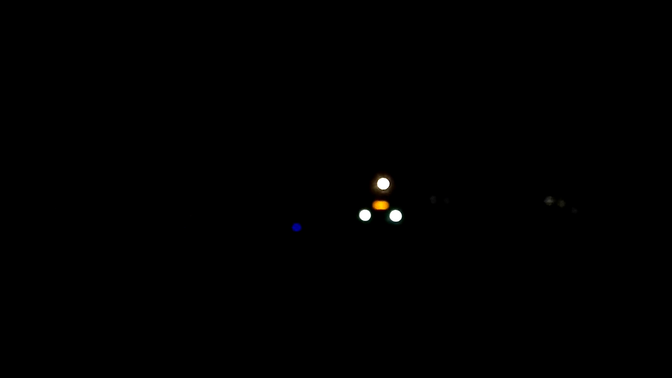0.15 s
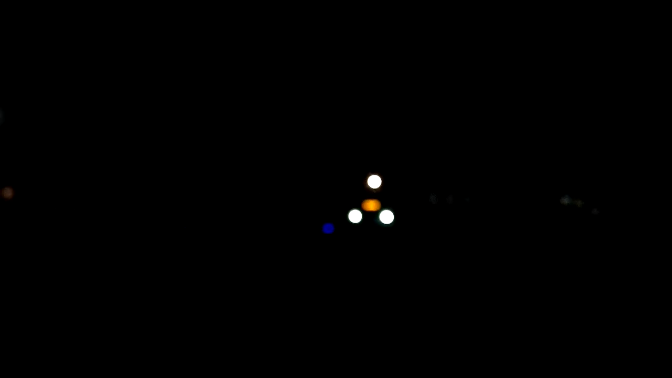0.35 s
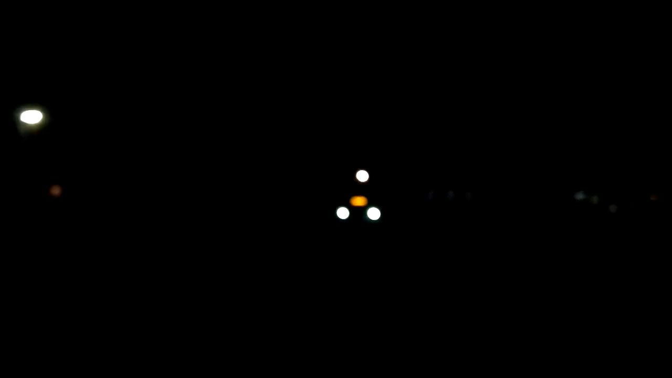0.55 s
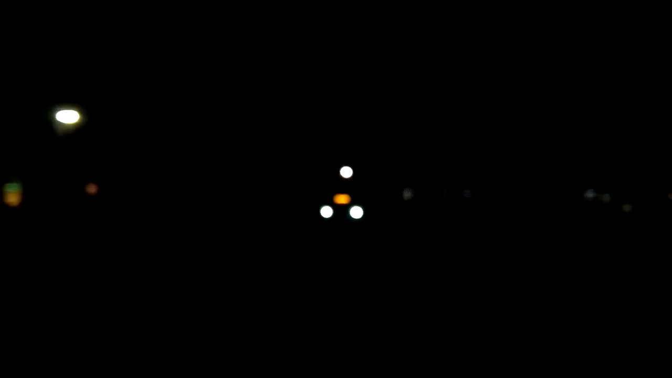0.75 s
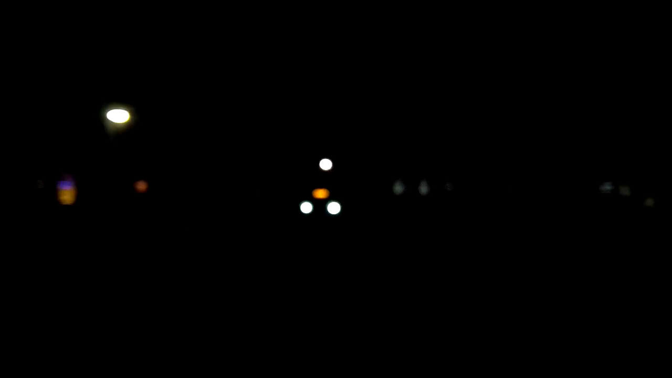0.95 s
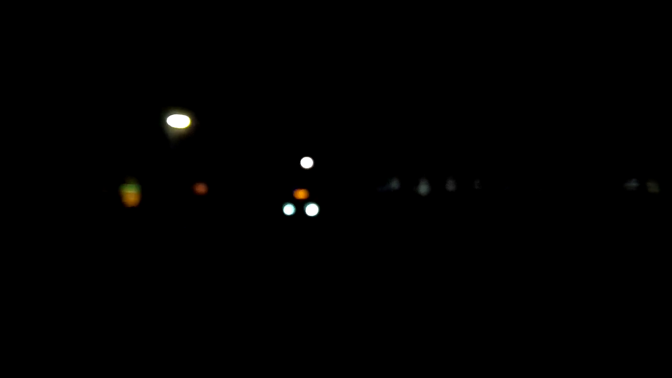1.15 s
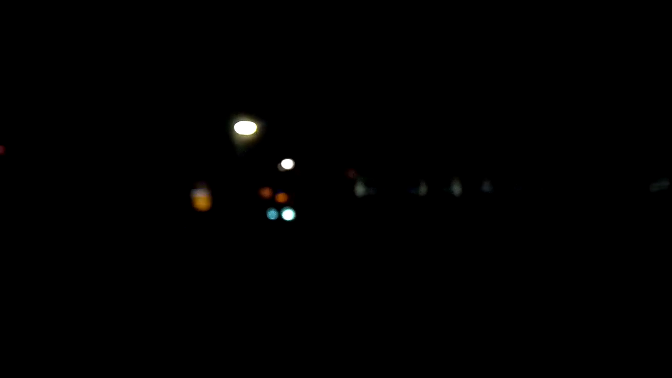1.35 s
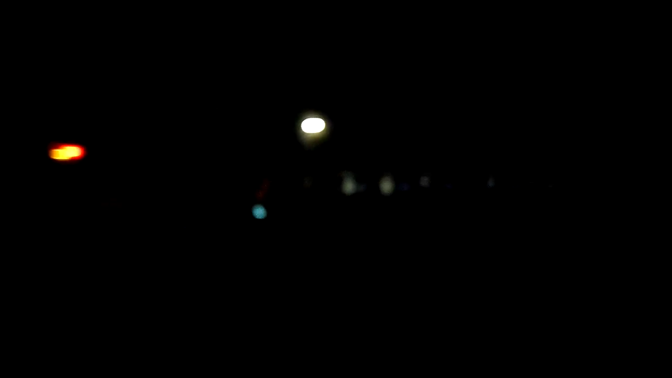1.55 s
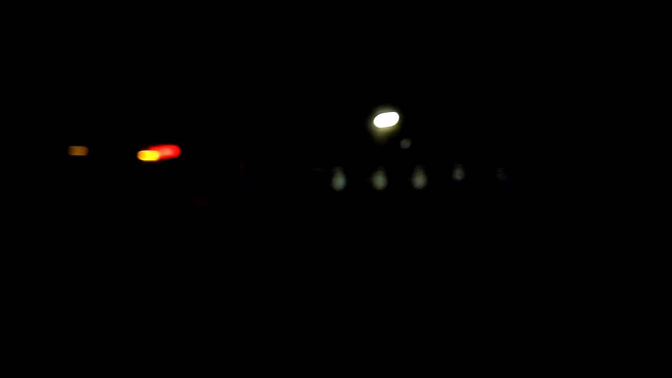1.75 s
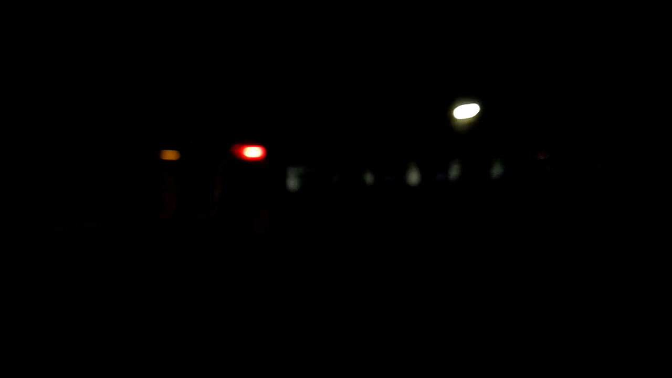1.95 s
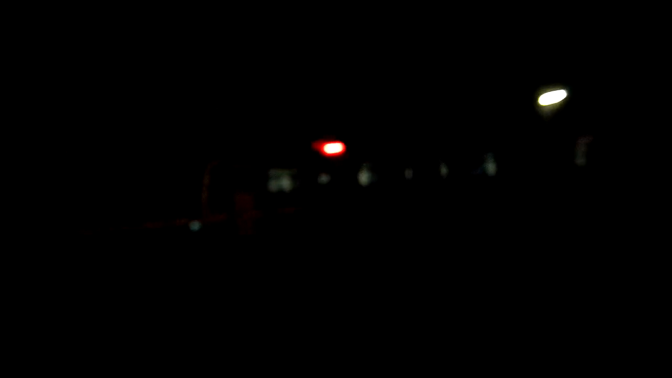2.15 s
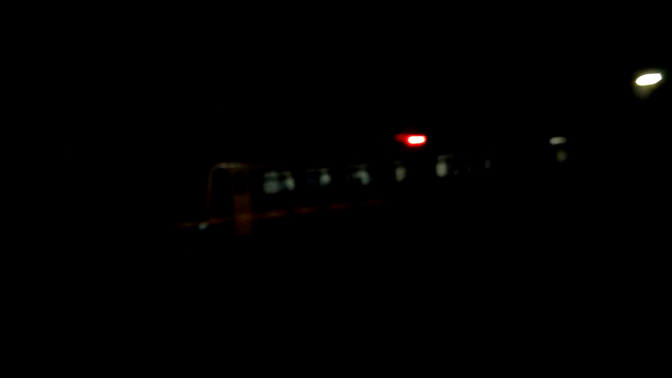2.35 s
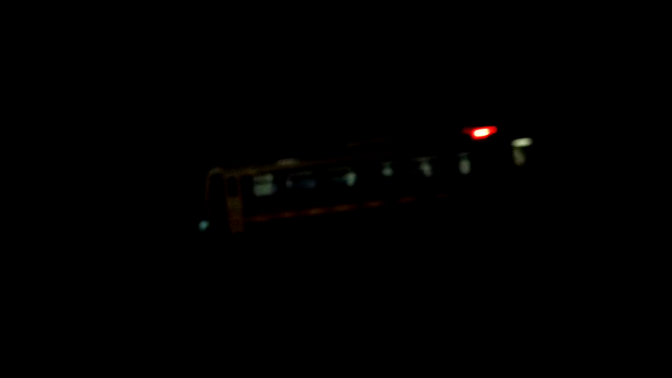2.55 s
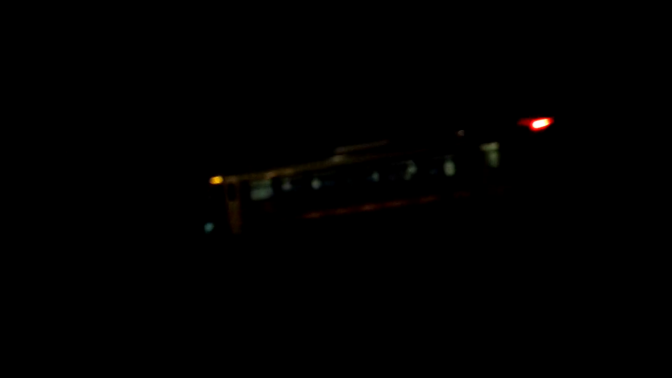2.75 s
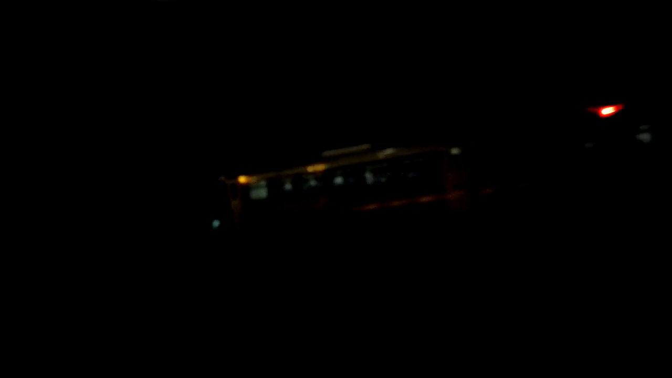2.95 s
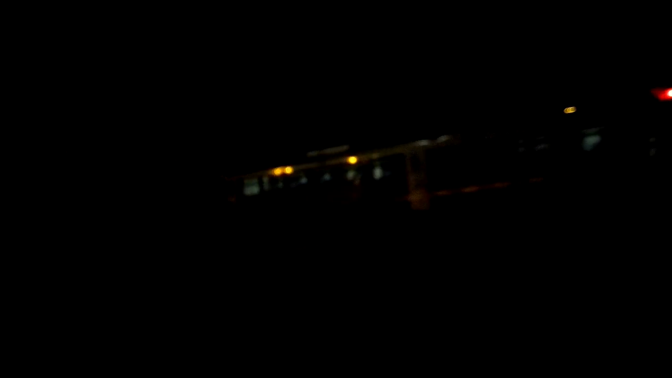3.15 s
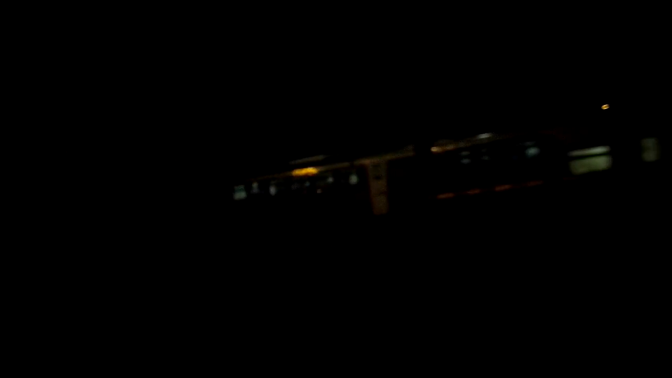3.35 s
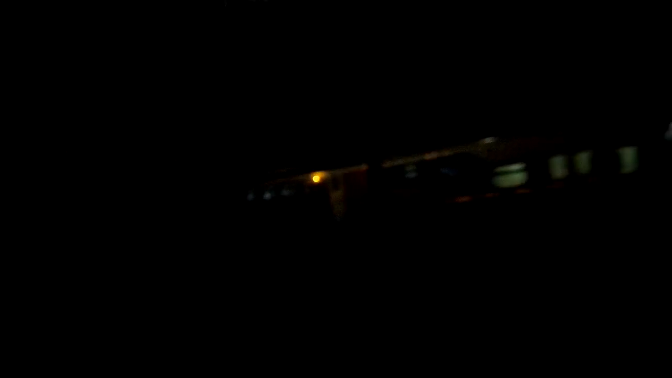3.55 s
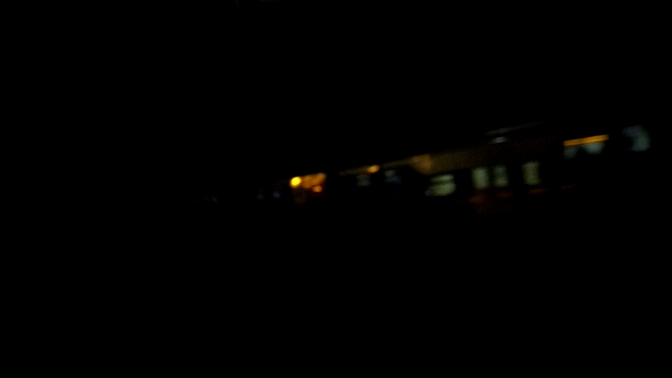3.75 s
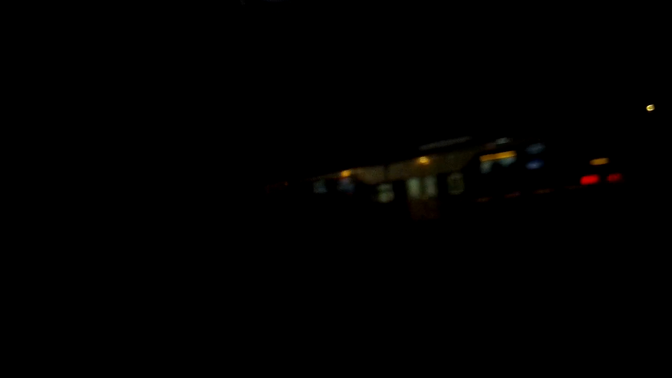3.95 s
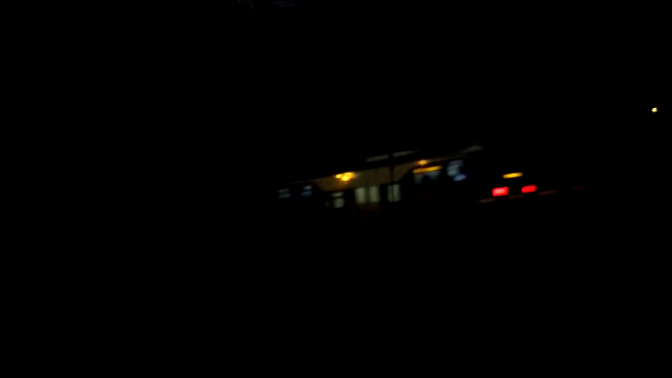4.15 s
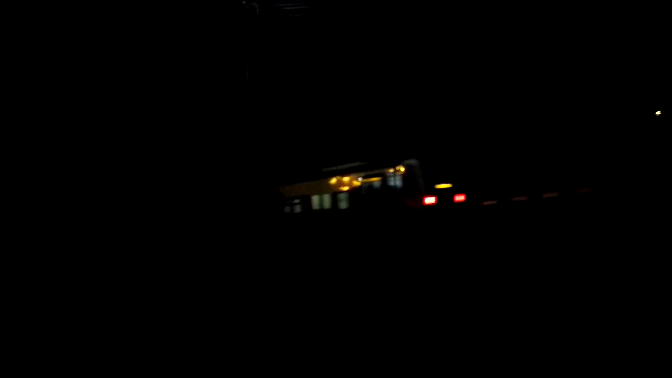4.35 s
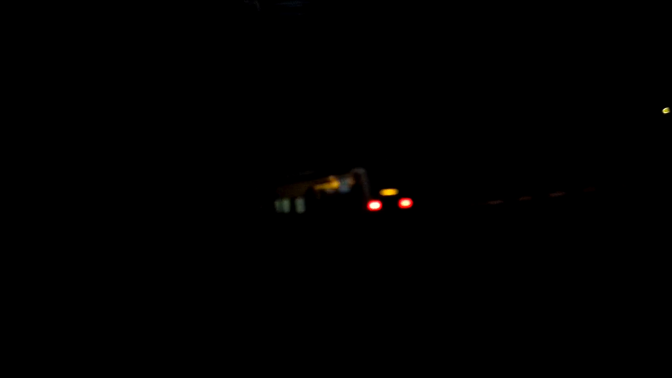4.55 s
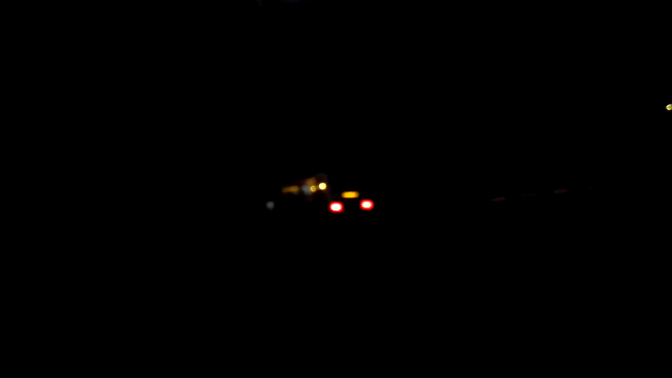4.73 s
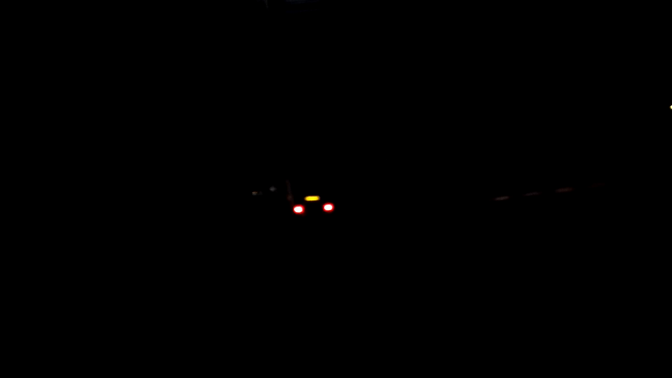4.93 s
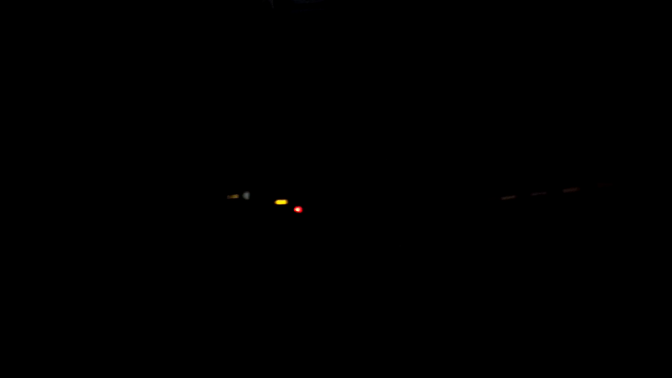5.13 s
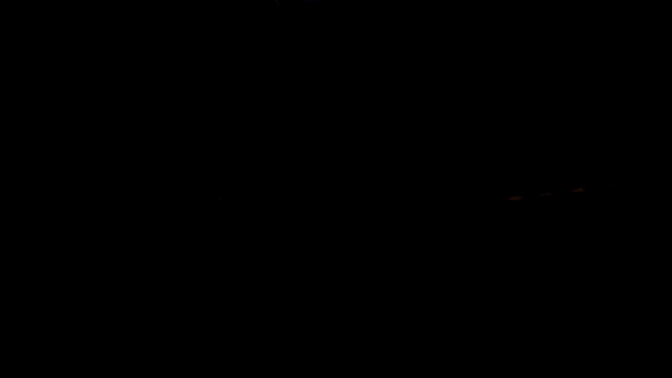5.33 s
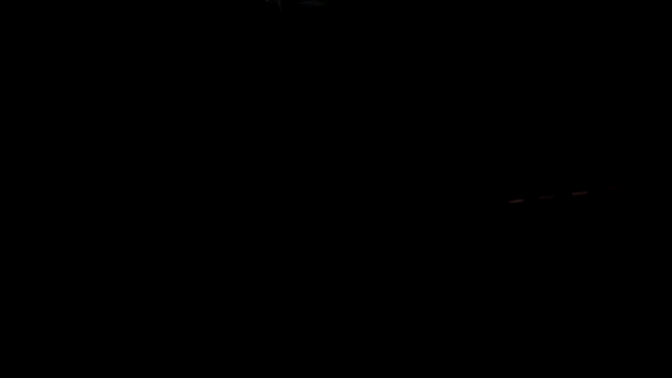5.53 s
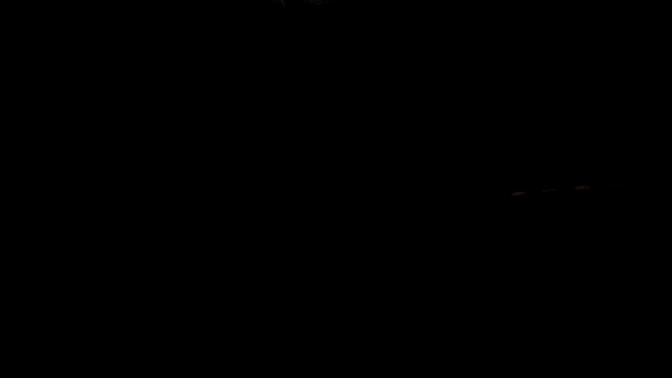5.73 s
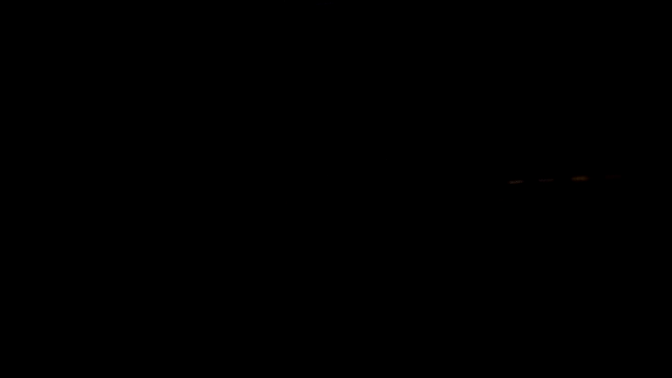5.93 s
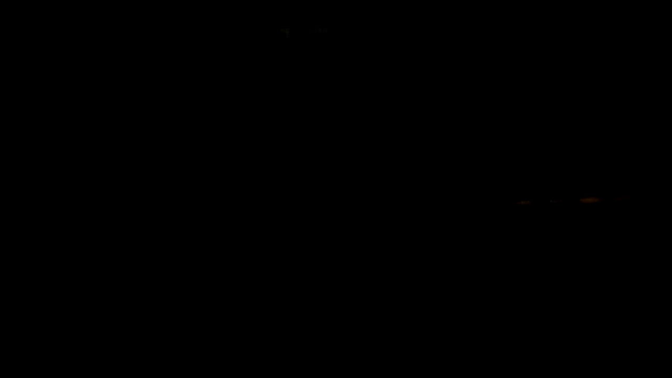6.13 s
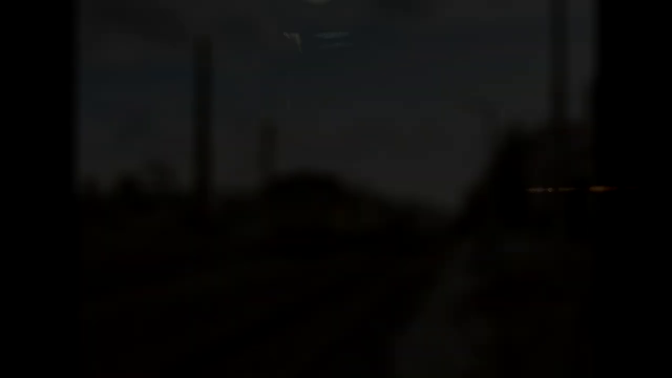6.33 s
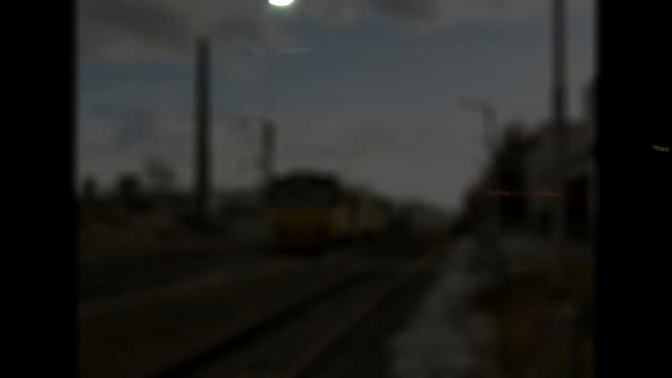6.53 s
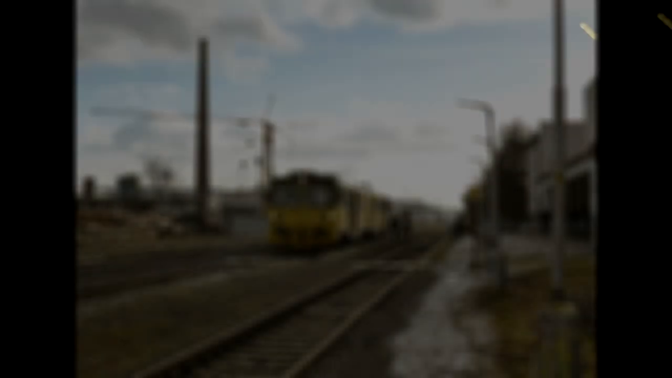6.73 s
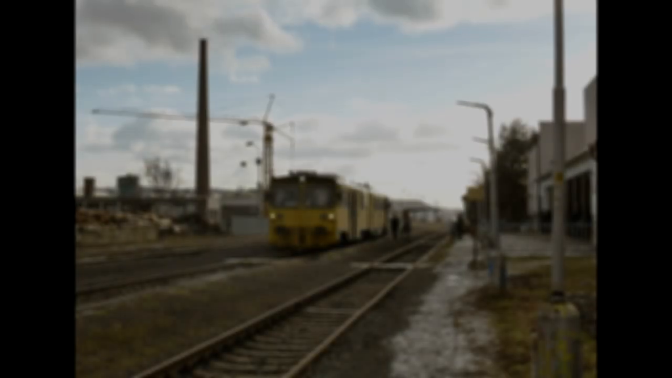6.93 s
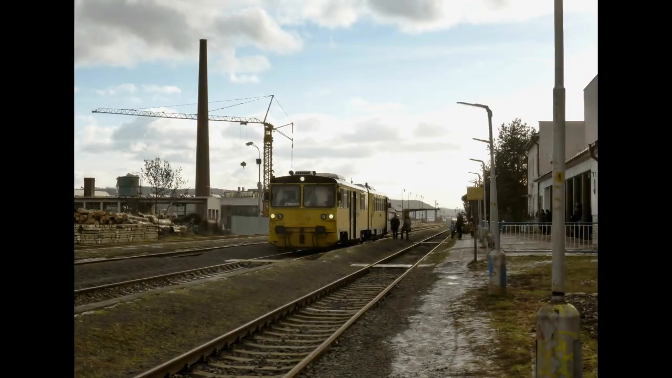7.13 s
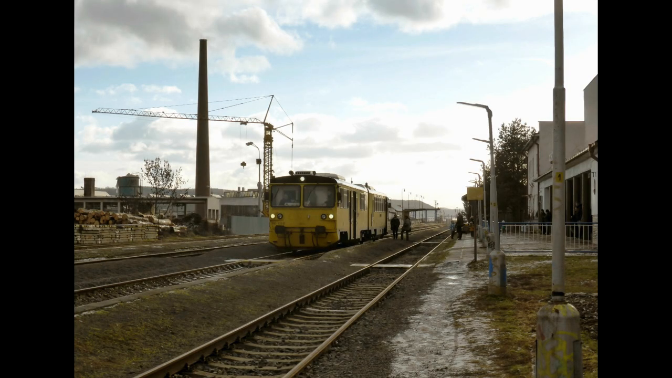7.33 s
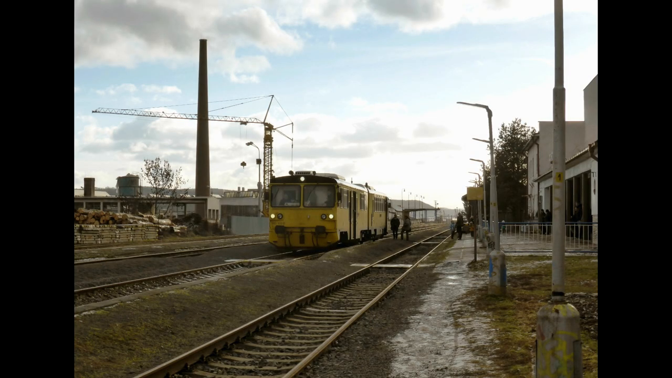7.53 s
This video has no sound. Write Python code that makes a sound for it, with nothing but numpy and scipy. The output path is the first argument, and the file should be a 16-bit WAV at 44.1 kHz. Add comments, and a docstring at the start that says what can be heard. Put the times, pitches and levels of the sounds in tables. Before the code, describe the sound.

A two-car diesel railcar passes close by, heard in stereo from beside the track. From the start there is a low rumble and a growing roar of rails, with irregular knocks and clanks as wheels cross rail joints. From about 0.8 seconds the steel wheels scrape, ring and hiss, joined by a thin, very high, fluttering squeal. The sound is loudest from roughly 1.3 to 4 seconds, with sleepers thumping under the axles and more knocks. Ring and squeal sink slightly in pitch as the train passes at about 3 seconds. The squeal ends just after 4 seconds, followed by one more strong knock. The roar then recedes, shifting from slightly right to slightly left, leaving dull low bumps, faint scrapes and distant clanks until about 6.7 seconds. A few light, hollow taps come around 7 seconds, and everything fades out by 7.3 seconds.

```python
"""A two-car diesel railcar passes close by at night and rolls away.
First the underframe rumbles and the rails roar, shaken by rough wheels that knock over rail joints.
As it draws level, the sleepers join in and friction makes the steel wheels ring, hiss and squeal;
ring and squeal sink in pitch by the Doppler effect as it passes, at about 3 s.
Then the roar recedes, leaving dull bumps, and a few light taps sound as everything fades out."""
import sys
import numpy as np
from scipy import signal
from scipy.fft import rfft, irfft, next_fast_len
from scipy.io import wavfile
from scipy.ndimage import map_coordinates

SR = 44100
rng = np.random.default_rng(int(sys.argv[2]) if len(sys.argv) > 2 else 0)


def inscribe(sig):
    """Save sig as 16-bit PCM at rate SR to the path in sys.argv[1].

    A 1-D sig is mono; a 2-D sig holds one channel per row.
    Samples are clipped to [-1, 1] before scaling.
    """
    pcm = np.round(np.clip(np.atleast_2d(sig).T, -1, 1) * 32767)
    wavfile.write(sys.argv[1], SR, pcm.astype(np.int16))


N = 334719
TIME = np.arange(N) / SR
SPEED_M_PER_S, SOUND_M_PER_S, DISTANCE_M = 14.92, 343, 3.98


# spectra of the vibrating parts: f/Hz, level/dB
UNDERFRAME_SPECTRUM = [(15, -23.5), (28, -9), (42, -0.5), (68, 3.5), (90, -2.5), (125, -4), (160, -22),
                       (300, -62)]
BODY_SPECTRUM = [(80, -35), (130, -1), (175, 1), (230, -4.5), (295, -14.5), (450, -52)]
SLEEPER_SPECTRUM = [(190, -19.5), (280, -3.5), (415, 1), (560, -4), (720, -10.5), (1300, -50.5)]
RAIL_SPECTRUM = [(330, -27.5), (500, -5.5), (700, -4.5), (950, -2), (1200, -5.5), (1500, -12), (2000, -16),
                 (4000, -54)]
# their passages: level/dB, abreast from t/s, until t/s, loss/dB per doubling of distance coming, going
UNDERFRAME_PASS = (-26, -1.5, 3, 0.1, 3)
BODY_PASS = (-25.5, 1.84, 3, 1.95, 5)
SLEEPER_PASS = (-22.5, 1.99, 3.5, 7, 10)
RAIL_PASS = (-22, 0.2, 3.5, 11, 7.5)

def rolling():
    """Forced vibration: rough wheels shake the underframe, car body, sleepers and rails."""
    rumble = amp(passing_db(*UNDERFRAME_PASS) + 2.0 * wander(14)) * noise(UNDERFRAME_SPECTRUM)
    body = amp(passing_db(*BODY_PASS) + 1.8 * wander(14)) * noise(BODY_SPECTRUM)
    sleepers = amp(passing_db(*SLEEPER_PASS) + 0.5 * wander(60)) * patchy(noise(SLEEPER_SPECTRUM), 2.5)
    rails = amp(passing_db(*RAIL_PASS) + 1.1 * wander(80)) * patchy(noise(RAIL_SPECTRUM), 2.0)
    mid_car_dip = amp(-2 * np.exp(-((TIME - 2.65) / 0.39) ** 2))  # no bogie is near
    return rumble + body + mid_car_dip * (sleepers + rails)


# flange leaning on the rail: start t/s, duration/s, scrape level/dB, hiss level/dB
FLANGE_RUBS = [(0.253, 0.23, -42.5, -36.5), (.61, 1.32, -22.5, -50), (0.787, 0.27, -31.5, -33.5),
               (1.271, 0.086, -16.5, -23), (1.953, 0.79, -18, -30), (2.455, .22, -23, -24.5),
               (2.745, 0.41, -23, -37.5), (3.35, 0.35, -40, -29.5), (4.502, 0.2, -43, -45.5),
               (4.795, 0.3, -40, -45), (6.327, 0.41, -55, -65.5)]
# passages of steady scrape and hiss: columns as in RAIL_PASS
SCRAPE_PASS = (-26, 0.94, 4, 0.5, 8.5)
HISS_PASS = (-39.5, 2.5, 4, 0, 12.0)

def friction_gains():
    """Incoherent sources add in power: rolling and flange contact set the gains of scrape and hiss."""
    scrape, hiss = amp(passing_db(*SCRAPE_PASS)), amp(passing_db(*HISS_PASS))
    for start, length, scrape_db, hiss_db in FLANGE_RUBS:
        contact = held(start, length, attack=0.047, t60=0.45)
        scrape = np.hypot(scrape, amp(scrape_db) * contact)
        hiss = np.hypot(hiss, amp(hiss_db) * contact)
    return scrape, hiss


# normal modes of a wheel at rest: f/Hz, nominal bandwidth/Hz, level/dB
WHEEL_MODES = [(1132, 94, 1), (1993, 68, -9), (2689, 58, -6), (2975, 34, -4), (3364, 90, -1.5),
               (3977, 52, 2), (4134, 120, -1), (5023, 150, -4), (5930, 110, -9), (6045, 120, -2)]
# spectra of steel heard side on and end on, and of dry hiss: f/Hz, level/dB
STEEL_SIDE_ON = [(900, -34), (1600, -5.5), (2400, -3), (4200, 1.5), (5500, 1.5), (6300, -1.5), (7400, -7),
                 (10000, -39)]
STEEL_END_ON = [(900, -30.5), (1500, -4.5), (2400, 0.5), (3500, -0.5), (5200, -3), (6500, -10.5),
                (7800, -20.5), (10000, -36)]
HISS_SPECTRUM = [(3500, -27), (7000, -5), (8200, 2.5), (9000, -6.5), (10400, -3), (12000, 3.5),
                 (13500, -1.5), (15700, -4.5)]
# passages of the side-on share of power and of one lasting mode: columns as in RAIL_PASS
SIDE_ON_PASS = (-1, 2, 4, 2.5, 15.5)
RING_PASS = (-34.5, 0.5, 4, 1.5, 11.5)

def wheels(doppler):
    """Modal radiation and directivity: rubbed steel discs ring and hiss, brightest when side on."""
    scrape_gain, hiss_gain = friction_gains()
    drive = noise([(20, 0), (20000, 0)])  # white
    # the contact point drifts across the tread and feeds each mode by turns
    ring = sum(amp(db + 2.2 * wander(9)) * unit_rms(resonate(drive, hz * doppler, 1.3 * width))
               for hz, width, db in WHEEL_MODES)
    side_on = amp(-3) * unit_rms(ring) + amp(-4) * patchy(noise(STEEL_SIDE_ON), depth_db=4.0)
    end_on = patchy(noise(STEEL_END_ON), depth_db=2.1)
    facing = np.clip(amp(passing_db(*SIDE_ON_PASS)), 0, 1)
    steel = np.sqrt(facing) * side_on + np.sqrt(1 - facing) * end_on
    scrape = scrape_gain * amp(0.82 * wander(250)) * steel
    lasting_mode = unit_rms(resonate(noise(STEEL_END_ON), hz=1997 * doppler, width=54))
    hiss = hiss_gain * amp(2.1 * wander(40)) * patchy(noise(HISS_SPECTRUM), depth_db=4.5)
    return scrape + amp(passing_db(*RING_PASS)) * lasting_mode + hiss


# bites of a flange, and late on two wide rasps of distant clanks: peak t/s, duration/s, f/Hz, bandwidth/Hz,
# level/dB
FLANGE_BITES = [(.247, 0.14, 2840, 200, -35.5), (.82, 0.16, 2820, 30, -27), (0.862, 0.27, 4160, 220, -18.5),
                (0.921, .7, 2052, 45, -26.5), (1.327, .16, 4040, 201.2, -20.5),
                (1.347, 0.23, 2050, 35, -24), (1.5, 0.41, 5140, 60.6, -32), (2.2, .3, 5280, 40, -25),
                (2.53, 0.28, 4173, 109.4, -18), (2.458, .5, 2990, 70.2, -25.5), (2.721, .15, 2988, 70, -20),
                (2.792, .25, 5935, 35, -20), (3.477, 0.69, 6040, 148, -30.5), (3.951, .6, 1925, 70, -40),
                (4.023, 0.23, 4000, 120.4, -37.5), (4.183, 0.32, 3256, 30, -34),
                (4.463, 0.39, 2620, 40, -43), (4.794, .7, 1930, 70, -42.5), (4.747, .9, 1100, 220, -44),
                (5.1, 0.79, 15100, 1300, -45.5), (5.247, 0.25, 6740, 2500, -44.5),
                (5.727, 0.058, 3550, 2000, -39.5), (5.996, .24, 2930, 2400, -42)]

def flange_bites():
    """Resonance: a flange bites and the wheel sings in a narrow band or rasps in a wide one; the wide rasps
    near 5.7 and 6.0 s are distant clanks."""
    out = np.zeros((2, N))
    for peak, length, hz, width, db in FLANGE_BITES:
        tone = unit_rms(resonate(rng.standard_normal((2, 2 * SR)), hz, width)[:, :int(length * SR)])
        add(out, peak - length / 2, amp(db) * tone * np.hanning(tone.shape[1]))
    return out


# spells of stick-slip: start t/s, duration/s, wheel (0 or 1), tone level/dB, fizz level/dB
SQUEALS = [(.25, .15, 0, -61, -41), (.82, .73, 0, -29.5, -28.5), (0.953, .24, 0, -27.5, -27.5),
           (1.53, .47, 0, -16.5, -19), (1.99, 0.41, 1, -23, -23.5), (2.28, 0.095, 0, -19.5, -22.5),
           (2.42, 0.61, 0, -37, -25), (2.54, 0.13, 1, -22.5, -39), (2.78, 0.9, 0, -17, -24.5),
           (3.68, .36, 0, -21, -31), (4.04, 0.13, 0, -31, -37), (5.53, .13, 0, -86, -61)]
# spectrum of the fizz at rest: f/Hz, level/dB
FIZZ_SPECTRUM = [(11300, -47.5), (12100, -14.5), (12600, -3), (13400, -1), (13900, -5), (14400, -19),
                 (15200, -45)]

def squeal(doppler, rest_hz=13355, second_wheel_ratio=0.901):
    """Self-excited oscillation: stick-slip drives very high modes of two wheels, thin tones in fizz."""
    hz = rest_hz * doppler
    tone_gain, fizz_gain = np.zeros((2, N)), np.zeros(N)
    for start, length, wheel, tone_db, fizz_db in SQUEALS:
        slip = held(start, length, attack=0.058, t60=0.57)
        tone_gain[wheel] = np.hypot(tone_gain[wheel], amp(tone_db) * slip)
        fizz_gain = np.hypot(fizz_gain, amp(fizz_db) * slip)
    tones = tone_gain[0] * whistle(hz) + tone_gain[1] * whistle(hz * second_wheel_ratio)
    slide = np.exp(2j * np.pi * np.cumsum(hz - rest_hz) / SR)  # the fizz sinks with the tone
    fizz = (signal.hilbert(noise(FIZZ_SPECTRUM), next_fast_len(N))[:, :N] * slide).real
    return tones + fizz_gain * amp(1.8 * wander(70)) * fizz


def whistle(hz):
    """Multipath interference: a sustained tone flutters differently at each microphone."""
    phase = 2 * np.pi * np.cumsum(hz + 7 * wander(40)) / SR
    tone = np.array([np.sin(phase + 1.5 * wander(25)) * amp(1.4 * wander(35)) for _ in range(2)])
    flutter = resonate(rng.standard_normal((2, N)), hz, width=170)
    return unit_rms(unit_rms(tone) + 0.9 * unit_rms(flutter))


# wheels on rail joints: t/s, thud level/dB, thud f/Hz, thud T60/s, clank level/dB
JOINT_KNOCKS = [(.186, -22, 910, 0.054, -20.5), (.197, -7, 1020, 0.058, -21.5),
                (.638, -12.5, 870, 0.21, -16.5), (1.003, -11, 885, 0.066, -29),
                (1.159, -12.5, 858, .07, -20), (1.246, -6, 900, 0.03, -17),
                (1.298, -16.5, 1110, 0.37, -25.5), (1.758, -10.5, 915, 0.12, -23.5),
                (2.667, -8.5, 720, 0.041, -28), (2.845, -10.5, 598, 0.19, -23),
                (3.356, -8.5, 590, 0.049, -22.5), (3.606, -12, 603, 0.16, -41),
                (3.786, -12, 676, 0.13, -19.5), (4.291, -7, 760, 0.12, -17), (4.531, -25.5, 530, 0.23, -45),
                (5.465, -38, 770, 0.68, -34), (5.956, -33, 836, 0.49, -35.5), (6.642, -41, 800, 0.36, -47)]
# spectrum of struck steel: f/Hz, level/dB
CLANK_SPECTRUM = [(200, -26), (600, 4.5), (1300, -2.5), (2600, 0.5), (4300, -6.5), (6500, -15.5),
                  (9000, -26), (15000, -39.5)]

def rail_joints(doppler, rise_s=0.0056):
    """Impact excitation: a wheel drops into the gap; steel cracks, the track thuds, the wheel clanks."""
    out, size = np.zeros((2, N)), SR // 2
    for start, thud_db, hz, t60, clank_db in JOINT_KNOCKS:
        track = noise([(100, -12), (300, -1.0), (1300, 0.5), (3000, -20)], size)
        thud = burst(resonate(track, hz, width=0.88 * hz), rise_s, t60)
        rattle = noise(CLANK_SPECTRUM, size)
        shift = np.interp(start, TIME, doppler)
        ring = unit_rms(sum(amp(db) * resonate(rattle, f * shift, width) for f, width, db in WHEEL_MODES))
        clank = burst(rattle + 0.38 * ring, rise_s + 0.0024, t60=0.38)
        crack = amp(-7.5) * burst(noise(CLANK_SPECTRUM, size), rise_s, t60=0.044)
        add(out, start, amp(thud_db) * thud + amp(clank_db) * (clank + crack))
    return out


# axles over loose sleepers: t/s, level/dB, f/Hz
SLEEPER_THUMPS = [(1.322, -12.5, 392), (2.281, -20, 430), (2.387, -18.5, 422), (3.207, -15, 433),
                  (3.246, -14, 430), (3.325, -16.5, 410), (3.944, -17.5, 400), (4.03, -19.5, 453),
                  (4.112, -24, 460), (4.303, -13.5, 340)]

def loose_sleepers():
    """Damped resonance: a loose sleeper thumps under an axle."""
    out = np.zeros((2, N))
    for start, db, hz in SLEEPER_THUMPS:
        thump = resonate(noise(SLEEPER_SPECTRUM, SR // 2), hz, width=190)
        add(out, start, amp(db) * burst(thump, rise=0.0042, t60=0.13))
    return out


# dull bumps of the running gear: t/s, level/dB, f/Hz
GEAR_BUMPS = [(.24, -20, 68), (.66, -20.5, 74), (1.1, -19, 82), (3.081, -16, 72), (4.455, -21, 64),
              (4.989, -27.5, 84), (5.208, -28.5, 189), (5.42, -26.5, 64.3), (5.691, -28.5, 201),
              (5.914, -25, 103), (6.125, -23.5, 62), (6.614, -25, 64.5)]

def running_gear():
    """Free vibration: each low swing of the running gear is a damped sinusoid."""
    out, t = np.zeros((2, N)), np.arange(SR // 2) / SR
    for start, db, hz in GEAR_BUMPS:
        swing = np.sin(2 * np.pi * hz * t)[None]
        add(out, start, amp(db) * burst(swing, rise=0.013, t60=0.19))
    return out


# light taps: t/s, level/dB, f/Hz
TAPS = [(6.887, -36, 647), (6.931, -26, 970), (6.978, -28, 840), (7.140, -29, 1048)]

def taps():
    """Heavy damping: a broad resonance dies at once and is heard as a small hollow tap."""
    out = np.zeros((2, N))
    for start, db, hz in TAPS:
        hollow = resonate(noise(RAIL_SPECTRUM, 4096), hz, width=450)
        add(out, start, amp(db) * burst(hollow, rise=0.0015, t60=0.023))
    return out


# stereo width: f/Hz, side minus mid level/dB
STEREO_WIDTH = [(60, -19), (130, -18), (280, -12.5), (600, -9.5), (1200, -6), (2400, -2.5), (4400, -1.5),
                (15000, 1.5)]

def noise(spectrum, size=N):
    """Spatial coherence: coloured noise at two microphones is alike in the bass, unrelated in the treble."""
    length = next_fast_len(size)
    hz = np.fft.rfftfreq(length, 1 / SR)
    mid, side = rfft(rng.standard_normal((2, length)))
    side = side * amp(level_at(STEREO_WIDTH, hz))
    coloured = np.array([mid + side, mid - side]) * amp(level_at(spectrum, hz))
    return unit_rms(irfft(coloured, length)[:, :size])


def passing_db(level_db, first, last, coming_db, going_db):
    """Spreading loss: the level holds while abreast and falls with each doubling of distance."""
    def doublings(gap_s):
        return np.log2(np.hypot(1, SPEED_M_PER_S * np.maximum(gap_s, 0) / DISTANCE_M))
    return level_db - coming_db * doublings(first - TIME) - going_db * doublings(TIME - last)


def resonate(x, hz, width):
    """Heterodyne filtering: a steep resonance of gain 1 that may follow a pitch curve."""
    turn = np.exp(2j * np.pi * np.cumsum(hz * np.ones(x.shape[-1])) / SR)
    r = np.exp(-np.pi * abs(width) / SR)
    baseband = signal.lfilter([(1 - r) ** 2], [1, -2 * r, r * r], x * turn.conj() + 1e-18)
    return 2 * (turn * baseband).real


def patchy(x, depth_db):
    """Random modulation: rough running surfaces make patches of the spectrum swell and sink."""
    spectra = signal.stft(x, nperseg=1024)[2]
    smoothing = np.outer(np.hanning(9), np.hanning(11))
    patches = unit_rms(signal.oaconvolve(rng.standard_normal(spectra.shape[1:]), smoothing, "same"))
    return unit_rms(signal.istft(spectra * amp(depth_db * patches), nperseg=1024)[1][:, :N])


def burst(carrier, rise, t60):
    """Exponential decay after a linear rise, with a power of 1 at the top."""
    t = np.arange(carrier.shape[1]) / SR
    shape = np.minimum(t / rise, 1) * amp(-60 * np.maximum(t - rise, 0) / t60)
    return unit_rms(carrier * shape) * np.sqrt(np.mean(shape ** 2))


def held(start, length, attack, t60):
    """An envelope that rises, holds and decays exponentially."""
    decay = amp(-60 * np.clip((TIME - start - length) / t60, 0, 3))
    return np.clip((TIME - start) / attack, 0, 1) * decay


def wander(per_s):
    """A random curve of rms 1 that turns about per_s times a second."""
    knots = rng.standard_normal(4096)
    return unit_rms(np.interp(TIME * per_s, np.arange(len(knots)), knots))


def level_at(spectrum, hz):
    """Linear interpolation on a log-frequency axis."""
    f, db = np.transpose(spectrum)
    return np.interp(np.log(hz + 1), np.log(f + 1), db)


def amp(db):
    """Decibels to gain."""
    return 10 ** (np.asarray(db) / 20)


def unit_rms(x):
    """Normalises to an rms of 1."""
    return x / np.sqrt(np.mean(x ** 2) + 1e-20)


def add(mix, start, sound):
    """Superposes a sound from its start time."""
    part = mix[:, max(round(start * SR), 0):][:, :sound.shape[1]]
    part += sound[:, :part.shape[1]]


def scene(passing_s=3.014, pitch_turn_m=15.9):
    """Superposition of all sources; the Doppler effect lowers the wheel modes and the squeal."""
    along_m = SPEED_M_PER_S * (TIME - passing_s)
    receding_m_per_s = SPEED_M_PER_S * along_m / np.hypot(along_m, pitch_turn_m)
    doppler = 1 / (1 + receding_m_per_s / SOUND_M_PER_S)
    return (rolling() + wheels(doppler) + flange_bites() + squeal(doppler) + rail_joints(doppler)
            + loose_sleepers() + running_gear() + taps())


# direction of the train: t/s, bearing (positive to the right)
BEARING = [(0, 2.0), (.7, 2.5), (1.3, 1), (4.2, 1.0), (4.7, -0.4), (7.2, -0.8)]
# balance at a bearing of 1: f/Hz, left minus right level/dB
BALANCE = [(60, 0), (250, -0.4), (1000, -1), (4000, -2), (8000, -1.6), (13000, 0)]

def record(dry, lag_s=0.00006, fade_end_s=7.322, fade_s=0.97, cutoff_hz=15750):
    """Time and level differences: the nearer microphone hears the train sooner and brighter."""
    length = next_fast_len(N + 4096)
    bearing = np.interp(TIME, *np.transpose(BEARING))
    lean_db = level_at(BALANCE, np.fft.rfftfreq(length, 1 / SR))
    leaning = irfft(rfft(dry, length) * amp([lean_db / 2, -lean_db / 2]), length)[:, :N]
    left, right = dry + bearing * (leaning - dry)
    left = map_coordinates(left, [(TIME - lag_s * bearing) * SR], order=5)
    x = np.array([left, right])
    x = x / (1 + x ** 8) ** (1 / 8)  # rounds off the highest peaks
    x = x * np.clip((fade_end_s - TIME) / fade_s, 0, 1)
    lowpass = signal.firwin(801, cutoff_hz, window=("kaiser", 9), fs=SR)
    return signal.oaconvolve(x, lowpass[None], "same")


dry = scene()
out = record(dry)
inscribe(out)
```